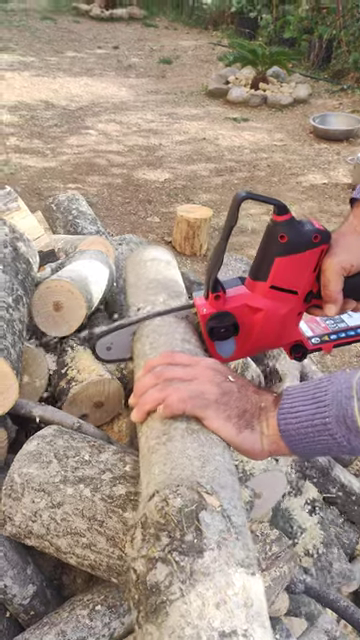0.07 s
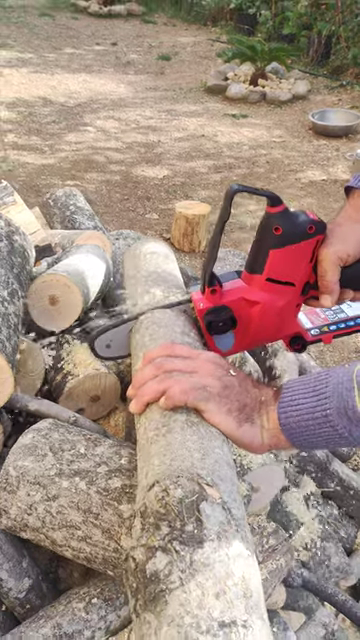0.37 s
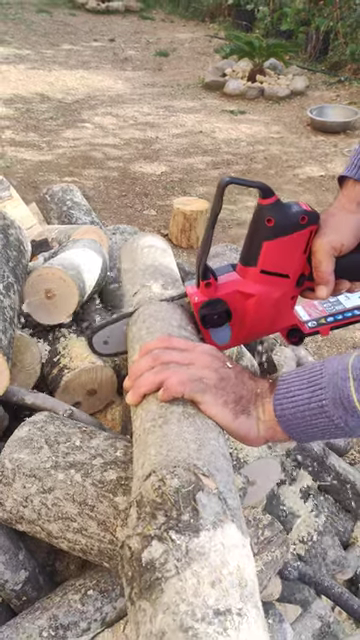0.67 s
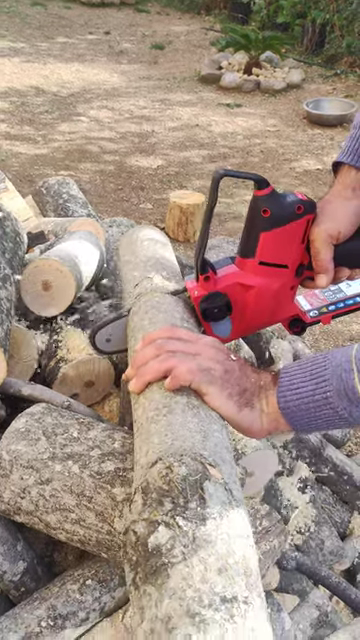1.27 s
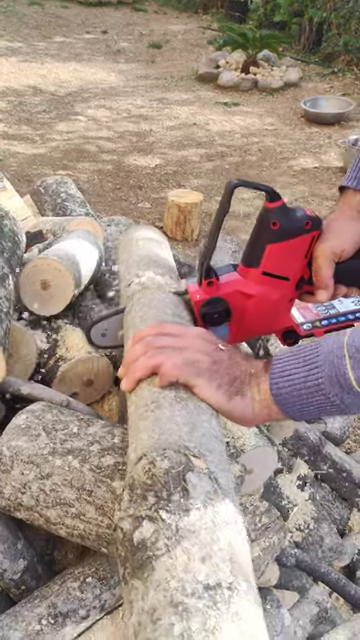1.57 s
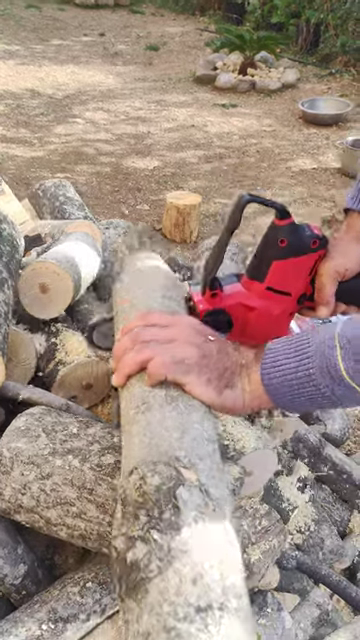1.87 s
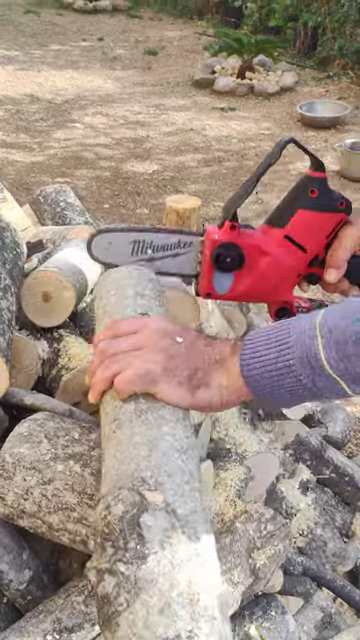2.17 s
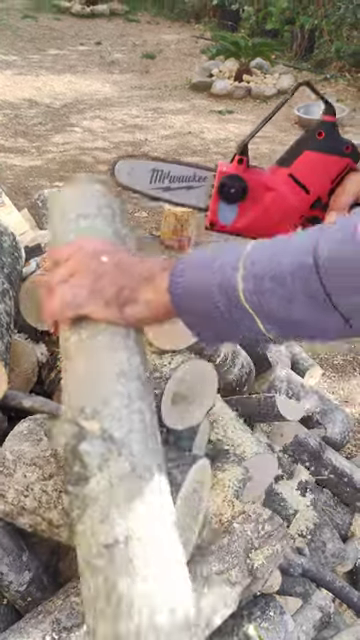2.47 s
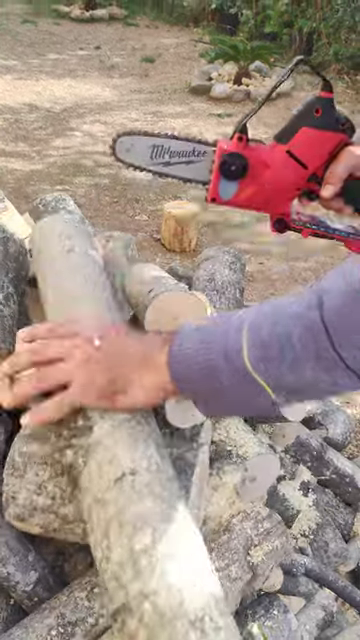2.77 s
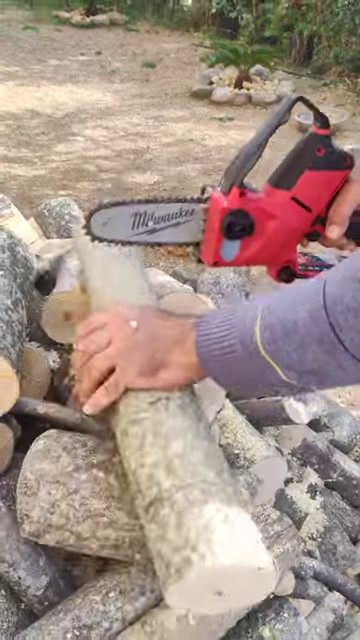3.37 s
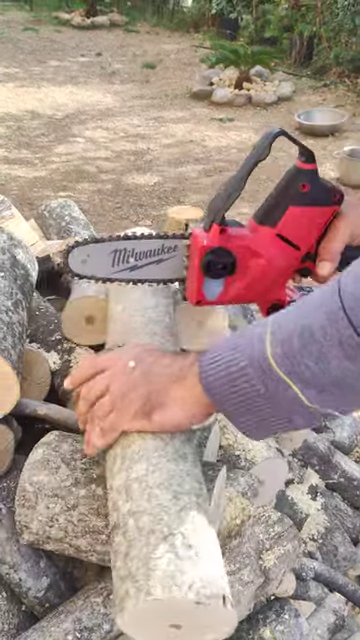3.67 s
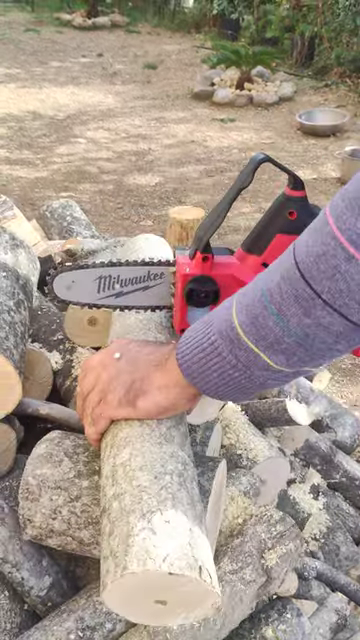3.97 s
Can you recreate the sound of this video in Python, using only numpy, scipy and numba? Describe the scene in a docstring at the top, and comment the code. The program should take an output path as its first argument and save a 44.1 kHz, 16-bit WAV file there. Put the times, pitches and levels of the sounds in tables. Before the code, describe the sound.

A small cordless chainsaw rasps and whines through a log outdoors. The piece breaks off with a crack and the chain rattles to a stop. Then the log is shifted on a woodpile with dull knocks and light scrapes.

```python
"""A small cordless chainsaw cuts through a log outdoors. First its cutters rasp and drive the resonances
of bar and wood, while motor and gear whine; the log's resonances sink as the kerf deepens. The last
fibres groan, and at 2 s the piece breaks off. Drag and friction then slow the motor, and the chain
rattles to a stop. Last, the log is shifted on the woodpile with a few dull knocks, ticks and scrapes."""
import sys
import numpy as np
from scipy import signal
from scipy.fft import rfft, irfft
from scipy.io import wavfile
from scipy.ndimage import uniform_filter1d
from numba import njit

SR = 44100
rng = np.random.default_rng(int(sys.argv[2]) if len(sys.argv) > 2 else 0)


def wav_record(signal):
    """Record a signal, one row per channel, as 16-bit PCM in the file named by sys.argv[1]."""
    frames = np.transpose(np.atleast_2d(signal))
    bounded = np.clip(frames, -1, 1)
    # unit amplitude maps onto the largest positive 16-bit level
    quanta = np.round(bounded * 32767).astype(np.int16)
    wavfile.write(sys.argv[1], SR, quanta)


N = 176400
TIME = np.arange(N) / SR

# Spectra of the cut and the running chain. Each row: frequency in Hz, left and right gain in dB.
CUT_SPECTRUM = [(50.2, -40, -39), (117, -36.5, -48.5), (210.4, -33.5, -40), (312, -11.5, -20.5),
                (433, -12, -15.5), (670, -6.5, -8.5), (1030, -10, -9.5), (1380, -9, -6.5), (1540, 1, 0),
                (2080, 5.5, -5), (2390, -2.5, -5.5), (3000, -3, -3.5), (3370, -10.5, -10),
                (4700, -15, -11.5), (5440, -17, -13), (6500, -21.5, -12.5), (7880, -23, -6.5),
                (8320, -16.5, -21.5), (10100, -17, -21.5), (13200, -21.5, -15), (13950, -16.5, -23)]
CHAIN_SPECTRUM = [(60.0, -34, -26.5), (150.0, -23.5, -37.5), (315, -24, -20.5), (660, -10.5, -11.5),
                  (1040, -17, -12.5), (1540, -7.5, -12.5), (1870, 3, 0), (2310, 0.5, -3), (3510, -10, -6.5),
                  (4800.0, -14, -12), (5640, -22, -14.5), (7650, -33, -7), (8600, -16, -22),
                  (12100, -25.5, -24), (14000.0, -29.5, -28.5)]
# Envelopes. Each row: time in seconds, relative level in dB.
CHAIN_PRESSURE = [(0, 5.5), (.4, 5), (1.0, 3.5), (1.5, 5), (1.72, 1), (1.93, 2.5), (1.97, -10), (2.0, 0),
                  (2.06, -14.5), (2.12, -48)]
CUT_TREBLE = [(0, 4), (.15, 2.5), (.42, 5.5), (1.1, 7), (1.7, 4.5), (1.92, 9)]
RATTLE_LEVEL = [(0, -26.5), (1.9, -23.5), (2.03, -21.5), (2.2, -25.5), (2.45, -27.5), (2.6, -32.5),
                (2.66, -35.5), (2.72, -37.5), (2.87, -41.5), (2.95, -46), (3.05, -42), (3.13, -80),
                (3.2, -100)]
GEAR_LEVEL = [(0, -37), (.35, -33), (.55, -25.5), (.9, -24), (1.2, -26), (1.4, -28.5), (1.57, -25.5),
              (1.7, -30), (1.8, -25.5), (1.93, -28), (2.0, -42), (2.2, -120)]
MOTOR_LEVEL = [(0, -50), (1.15, -45), (1.3, -38.5), (1.55, -39), (1.7, -35), (1.82, -31), (1.93, -33),
               (2.0, -33.5), (2.1, -37.5), (2.3, -42), (2.42, -35.5), (2.55, -42), (2.62, -56), (2.9, -75),
               (3.0, -120)]
SHAFT_LEVEL = [(0, -49), (1.85, -51), (2.05, -45), (2.25, -48), (2.45, -58), (2.8, -100)]
# Modes of the log being cut. Each row: first and last frequency in Hz, bandwidth in Hz,
# relative level in dB at no, half and full depth.
KERF_MODES = [(329, 140, 48, -43, -46, -52.5), (588, 490, 22, -38, -41, -45),
              (702.6, 530, 9.3, -36, -40, -42), (974, 700, 32, -49.5, -41, -28),
              (1165, 790, 64, -40, -39.5, -39), (1689, 1510, 31, -38.5, -26.5, -34)]
# Modes of bar and sprocket cover. Each row: frequency in Hz, bandwidth in Hz, relative level in dB.
BAR_MODES = [(2044, 36, -32), (2380, 200, -30.5), (3020, 70, -37.5), (3520, 330, -39.5), (3850, 30, -44),
             (7135, 100, -47.5), (7820, 82, -43)]
# Motor speed under power. Each row: time in seconds, turns per second.
MOTOR_SPEED = [(0, 279), (.3, 290), (.42, 294), (.55, 302), (.8, 305), (1.15, 301), (1.25, 315),
               (1.39, 329), (1.45, 323), (1.48, 303), (1.57, 307), (1.69, 287), (1.83, 319), (1.93, 308),
               (1.98, 351)]
# Tones of gear and motor. Each row: multiple of the motor speed, relative level in dB.
GEAR_ORDERS = [(6, 0), (7, -13), (8, -9)]
MOTOR_ORDERS = [(12, -17), (13, 0), (24, -7)]
# Fibres giving way. Each row: centre and half length in seconds, frequency in Hz, level in dB.
GROANS = [(1.66, .025, 462, -35), (1.806, .04, 796, -35), (1.87, .022, 542, -30), (1.887, .025, 399, -33)]
# Wood striking wood. Each row: start in seconds, thud, ring and crack level in dB, ring pitch ratio.
KNOCKS = [(1.986, -19.5, -15.5, -10.5, 0.95), (2.569, -15, -32, -35, 0.96), (2.796, -26, -29, -35.5, 1.05),
          (2.827, -34, -50, -36, 1.06), (2.899, -50, -50, -38.5, 0.9), (2.936, -44, -55, -33.5, 1.09),
          (2.975, -66, -42.5, -60, 0.99), (3.182, -48, -62, -52.5, 0.84), (3.319, -12.5, -30, -36, 0.81),
          (3.327, -38, -32, -53, 1.13), (3.342, -34, -45, -54, 1.4)]
# Modes of the struck pile and log. Each row: frequency in Hz, seconds to fall 60 dB, gain in dB.
PILE_MODES = [(170, 0.12, -32), (245, 0.032, -3), (396, 0.014, -0.5), (747, 0.041, -34)]
LOG_MODES = [(680.4, 0.11, -3), (1500, .06, -5), (2150, .06, -10), (2450, .05, -17)]
# Sharp snaps. Each row: start in seconds, level in dB, frequency in Hz, decay time in seconds.
TICKS = [(2.642, -32, 2120, 0.022), (2.662, -34, 2200, 0.022), (3.035, -33.5, 3240, 0.0067),
         (3.036, -29.5, 5960, 0.0021), (3.056, -23.5, 7100, 0.00092), (3.056, -33, 10400, 0.00057),
         (3.507, -46, 9660, 0.0029)]
# Sliding bark. Each row: centre and half length in seconds, rub and grit level in dB.
SCRAPES = [(2.852, 0.016, -48, -47), (3.042, 0.051, -54.5, -63), (3.276, 0.028, -55.5, -63),
           (3.318, 0.021, -48, -60), (3.465, 0.025, -63, -74), (3.56, 0.022, -64, -80),
           (3.707, 0.017, -59.5, -68), (3.82, 0.025, -68, -85), (3.935, 0.024, -60, -67)]
# Spectra of crushed bark, rubbed bark and outdoor air. Each row: frequency in Hz, relative gain in dB.
CRACK_SPECTRUM = [(100, 8.5), (700, -11.5), (2300, 15), (4000, -7), (14000, -39.5)]
RUB_SPECTRUM = [(100, 4), (700, 5), (1600, 6), (2200, 12), (2900, 4.5), (4000, -5), (7000, -1),
                (14000, -26)]
AIR_SPECTRUM = [(15, -24), (25, -3), (301, -14), (363, -9.5), (525, -19.5), (684, -17), (1150, -17),
                (1750, -25), (2000, -14), (2380, -14), (2710, -21.5), (14000, -44)]

CUTTERS_PER_TURN, LINKS_PER_TURN = .186, .744


def cutting(speed):
    """Impact excitation: cutters and links tear at the wood, making a rasp and ringing log and bar."""
    blows = impacts(speed * LINKS_PER_TURN, scatter_db=1, decay_s=.0026)
    blows += .31 * impacts(speed * CUTTERS_PER_TURN, scatter_db=1, decay_s=.0015)
    pressure_db = curve(CHAIN_PRESSURE)
    force = unit(1 + blows) * undb(pressure_db + 1.6 * walk(25))  # the cutters catch and slip
    spray = unit(1.7 + blows) * undb(pressure_db + curve(CUT_TREBLE))
    noise = hiss()
    low = signal.sosfiltfilt(signal.butter(2, 3800, fs=SR, output="sos"), noise)
    rasp = colour_sides(low * force + (noise - low) * spray, CUT_SPECTRUM)
    return (undb(-18.5) * unit(rasp) + kerf(force) + bar(force)) / np.sqrt(2)


def kerf(force, through_s=1.99):
    """Stiffness sets pitch: the log softens as the kerf deepens, so its modes sink."""
    depth = np.minimum(TIME / through_s, 1) ** 2.2
    rings = 0
    for first, last, width, *levels_db in KERF_MODES:
        gain = undb(np.interp(depth, [0, .5, 1], levels_db))
        rings += gain * rubbed_mode(force, first + (last - first) * depth, width)
    return np.tile(rings, (2, 1))


def bar(force):
    """Forced vibration: bar and cover ring, differently toward each side."""
    return np.array([sum(undb(db) * rubbed_mode(force, hz, width) for hz, width, db in BAR_MODES)
                     for side in range(2)])


def chain(speed):
    """Impact noise: links clatter over sprocket and bar at a rate proportional to motor speed."""
    rattle = hiss() * (.94 + impacts(speed * LINKS_PER_TURN, scatter_db=2.5, decay_s=.0052, jitter=.43))
    flap_db = 1.5 * walk(45)  # the slack chain flaps
    return unit(colour_sides(rattle, CHAIN_SPECTRUM)) * undb(curve(RATTLE_LEVEL) + flap_db)


def motor_speed(release_s=2.045, drag_s=.56):
    """Damped rotation: once the trigger is let go, drag and dry friction stop the motor."""
    coast_s = np.maximum(TIME - release_s, 0)
    friction = 75  # as a speed offset in turns per second
    return np.maximum((curve(MOTOR_SPEED) + friction) * np.exp(-coast_s / drag_s) - friction, 0)


def whine(speed):
    """Harmonics of rotation: gear, motor and shaft sing in a housing too small to radiate bass."""
    gear = tones(speed, GEAR_ORDERS, GEAR_LEVEL, chatter=.22)
    motor = tones(speed, MOTOR_ORDERS, MOTOR_LEVEL, chatter=.42)
    shaft = tones(speed, [(1, 0)], SHAFT_LEVEL, chatter=.22)
    return np.tile(butterworth(gear + motor + shaft, 3, 220, "high"), (2, 1))


def groans(width_hz=28):
    """Narrow resonance: the chain catches in the thinning wood, which groans briefly."""
    return stereo(sum(undb(db) * swell(at, half) * unit(band(rng.standard_normal(N), hz, width_hz))
                      for at, half, hz, db in GROANS))


def knocks():
    """Damped free vibration: each blow thuds in the pile, rings the log and crunches the bark."""
    body = crunch = 0
    for start, thud_db, ring_db, crack_db, ratio in KNOCKS:
        buzz = 1 + .45 * walk(180)  # the log buzzes against its neighbours
        body += undb(thud_db) * struck_modes(PILE_MODES, start)
        body += undb(ring_db) * buzz * struck_modes(LOG_MODES, start, ratio)
        crunch += undb(crack_db) * fade(start, decay_s=.0075)
    return stereo(butterworth(body, 4, 145, "high")) + crunch * unit(colour(hiss(), CRACK_SPECTRUM))


def ticks(relative_width=.066):
    """Narrow-band transients: small bright snaps as the chain stops and the log is moved."""
    noise = hiss()
    return sum(undb(db) * unit(np.array([band(side, hz, hz * relative_width) for side in noise]))
               * fade(start, decay) for start, db, hz, decay in TICKS)


def scrapes(grain_db=4):
    """Sliding friction: bark drags over bark, giving a woody rub and a fine grit above it."""
    grain = hiss() * undb(grain_db * walk(270))
    rub = unit(colour(grain, RUB_SPECTRUM))
    grit = unit(butterworth(grain, 2, (5000, 13500), "band"))
    return sum(swell(at, half) * (undb(rub_db) * rub + undb(grit_db) * grit)
               for at, half, rub_db, grit_db in SCRAPES)


def echo(direct, t60_s=.12):
    """Scattering: woodpile and ground return a short diffuse tail."""
    tail = rng.standard_normal((2, N)) * fade(.0057, t60_s / np.log(1000))
    return signal.fftconvolve(direct, unit(tail) / np.sqrt(N), axes=1)[:, :N]


def outdoor_air(level_db=-65, waver_db=5.5):
    """Ambient noise: quiet outdoor air wavers in level."""
    return undb(level_db) * unit(colour(hiss(), AIR_SPECTRUM)) * undb(waver_db * walk(8.3))


def impacts(rate, scatter_db, decay_s, jitter=.15):
    """Pulse train: the envelope of uneven, decaying blows at about the given rate."""
    count = np.floor(np.cumsum(rate * (1 + jitter * walk(150))) / SR)
    onsets = np.flatnonzero(np.diff(count) > 0)
    blows = np.zeros(N)
    blows[onsets] = undb(scatter_db * np.clip(rng.standard_normal(N)[:len(onsets)], -2, 2))
    return unit(signal.lfilter([1], [1, -np.exp(-1 / (decay_s * SR))], blows))


def rubbed_mode(force, hz, width, surge_db=2.5, wander=.008):
    """Driven resonance: a mode surges and wanders as the chain's contact shifts."""
    drive = force * rng.standard_normal(N) * undb(surge_db * walk(13.75))
    return unit(resonate(drive, hz * (1 + wander * walk(10)), float(width)))


def struck_modes(modes, start, ratio=1):
    """Impulse response: one decaying sine for each mode."""
    return sum(undb(db) * fade(start, t60 / np.log(1000))
               * np.sin(2 * np.pi * hz * ratio * (TIME - start)) for hz, t60, db in modes)


def tones(speed, orders, levels, chatter, flutter=.38, wobble=.0045):
    """Modulation: harmonics of a wobbling speed flutter slowly and chatter fast."""
    phase = 2 * np.pi * np.cumsum(speed * (1 + wobble * walk(120))) / SR
    total = 0
    for order, db in orders:
        amplitude = undb(db) * unit(1 + flutter * walk(60) + chatter * walk(450))
        total += amplitude * np.sin(order * phase + chatter * walk(350))
    return np.sqrt(2) * total * undb(curve(levels))


def stereo(x, lag_s=.00017):
    """Arrival delay: sound reaches the left side slightly late."""
    return np.array([np.interp(TIME - lag_s, TIME, x), x])


def hiss(coherent_hz=3100):
    """Partial coherence: white noise, alike on both sides in the bass and unrelated in the treble."""
    coherence = 1 / (1 + (np.arange(N // 2 + 1) * SR / N / coherent_hz) ** 2)
    common = rfft(stereo(rng.standard_normal(N)))
    separate = rfft(rng.standard_normal((2, N)))
    return irfft(common * np.sqrt(coherence) + separate * np.sqrt(1 - coherence))


def colour(x, spectrum, column=1):
    """Spectral shaping: the gain of one dB column with the minimum phase of the columns' mean."""
    size = 192000
    rows, hz = np.array(spectrum, float), np.arange(size // 2 + 1) * SR / size
    gain = lambda db: undb(np.interp(np.log(hz + 1), np.log(rows[:, 0]), db))
    cepstrum = irfft(np.log(gain(rows[:, 1:].mean(1))))
    cepstrum[1:size // 2] *= 2
    cepstrum[size // 2 + 1:] = 0
    return irfft(rfft(x, size) * gain(rows[:, column]) * np.exp(1j * rfft(cepstrum).imag))[..., :N]


def colour_sides(x, spectrum):
    """Spectral shaping of left and right, each by its own column."""
    return np.array([colour(x[0], spectrum, 1), colour(x[1], spectrum, 2)])


@njit
def resonate(x, hz, width):
    """Two-pole resonance whose centre may move."""
    y, band_state, low_state = np.empty(len(x)), 0., 0.
    for i in range(len(x)):
        tuning, damping = np.tan(np.pi * hz[i] / SR), width / hz[i]
        velocity = (band_state + tuning * (x[i] - low_state)) / (1 + tuning * (tuning + damping))
        band_state = 2 * velocity - band_state
        low_state += 2 * tuning * velocity
        y[i] = damping * velocity
    return y


def band(x, hz, width):
    """Resonance at a steady centre."""
    return resonate(x, np.full(N, float(hz)), float(width))


def butterworth(x, order, hz, kind):
    """Maximally flat filter."""
    return signal.sosfilt(signal.butter(order, hz, kind, fs=SR, output="sos"), x)


def fade(start, decay_s):
    """Exponential decay after a sudden start."""
    age = TIME - start
    return (age >= 0) * np.exp(-np.maximum(age, 0) / decay_s)


def swell(centre, half):
    """Bell-shaped envelope."""
    return np.exp(-.5 * ((TIME - centre) / half) ** 2)


def walk(rate):
    """Smooth random fluctuation with rms 1."""
    hold = max(int(SR / rate), 1)
    steps = np.repeat(rng.standard_normal(N // hold + 1), hold)
    return unit(uniform_filter1d(uniform_filter1d(steps, hold), hold)[:N])


def curve(rows):
    """Linear interpolation of (seconds, value) rows."""
    return np.interp(TIME, *np.array(rows, float).T)


def undb(db):
    """Decibels to gain."""
    return 10 ** (np.asarray(db) / 20)


def unit(x):
    """Scale to rms 1."""
    return x / np.sqrt(np.mean(x ** 2))


def scene():
    """Superposition: saw and log, their echo and the outdoor air add together."""
    speed = motor_speed()
    direct = cutting(speed) + chain(speed) + whine(speed) + knocks() + scrapes() + groans()
    return direct + undb(-12) * echo(direct) + ticks() + outdoor_air()


def record(dry, top_hz=14250):
    """Band limiting: a steep low-pass removes the highest treble."""
    return signal.sosfilt(signal.ellip(14, .2, 80, top_hz, fs=SR, output="sos"), dry)


dry = scene()
out = record(dry)
wav_record(out)
```